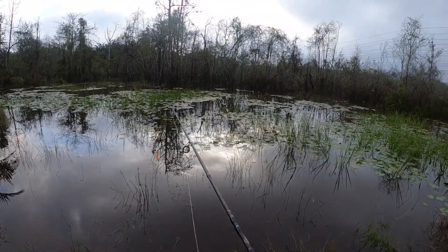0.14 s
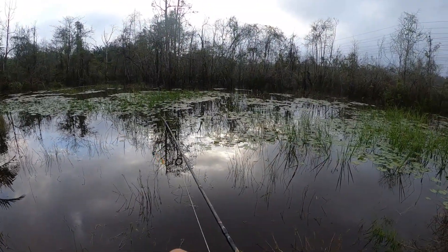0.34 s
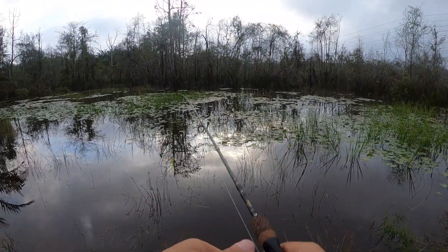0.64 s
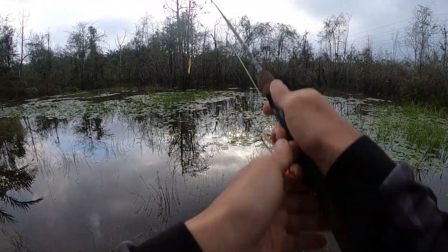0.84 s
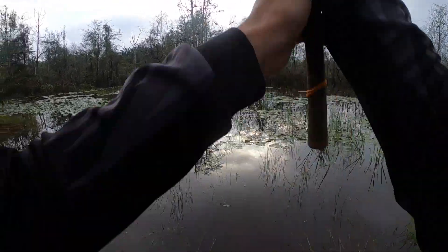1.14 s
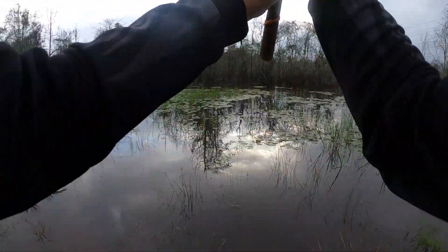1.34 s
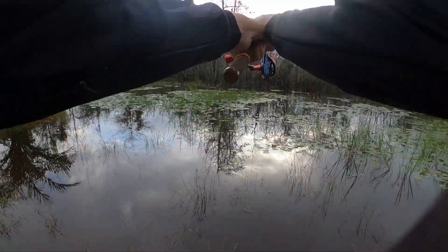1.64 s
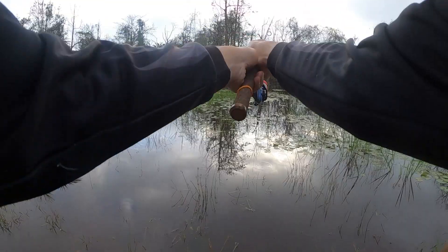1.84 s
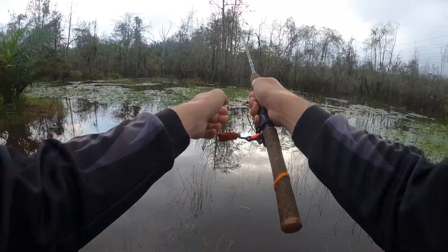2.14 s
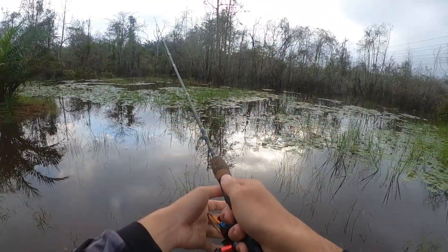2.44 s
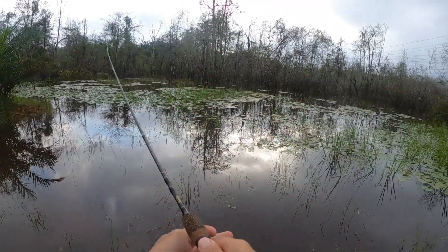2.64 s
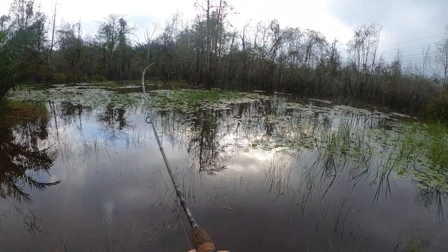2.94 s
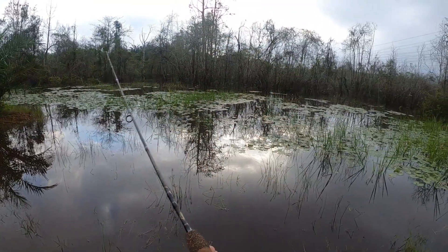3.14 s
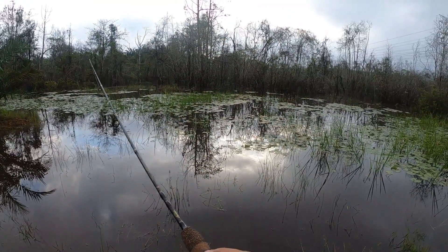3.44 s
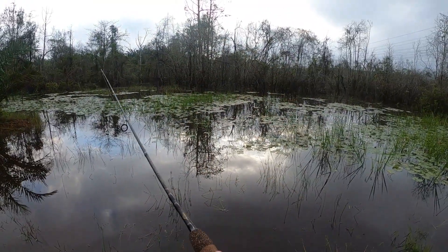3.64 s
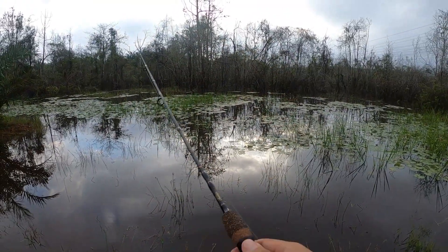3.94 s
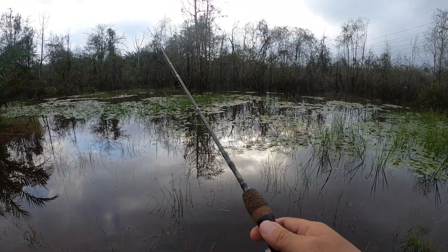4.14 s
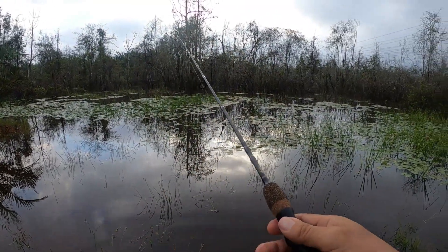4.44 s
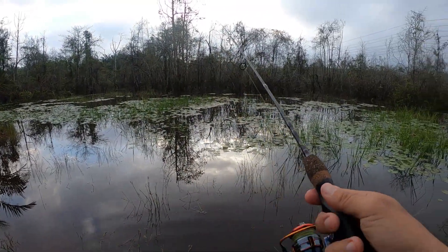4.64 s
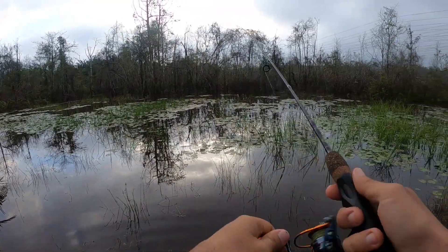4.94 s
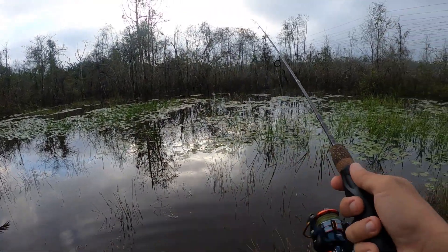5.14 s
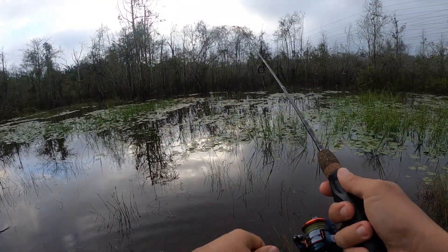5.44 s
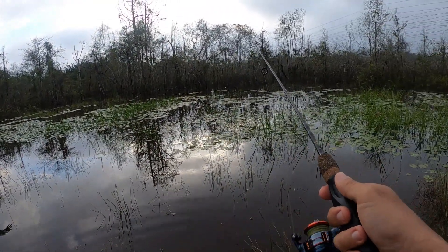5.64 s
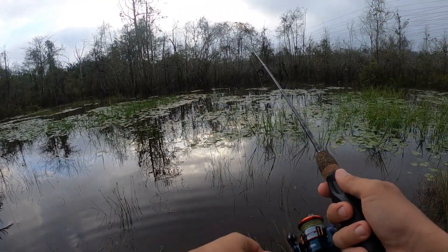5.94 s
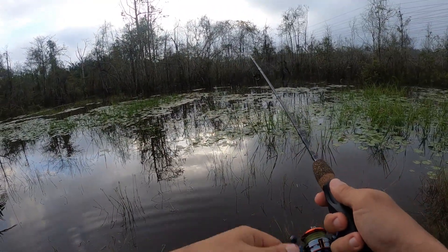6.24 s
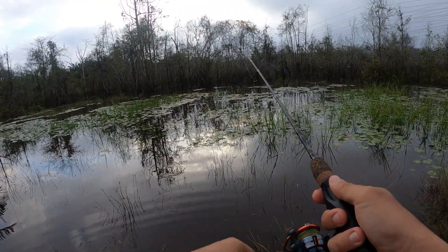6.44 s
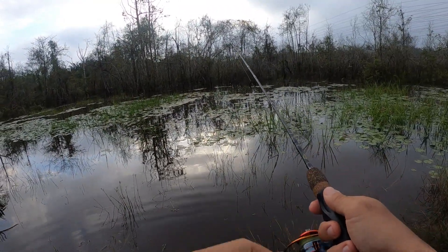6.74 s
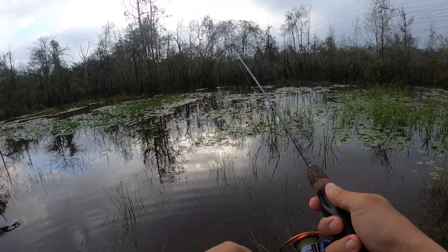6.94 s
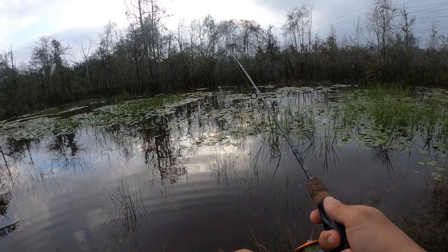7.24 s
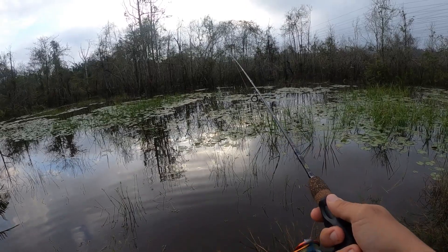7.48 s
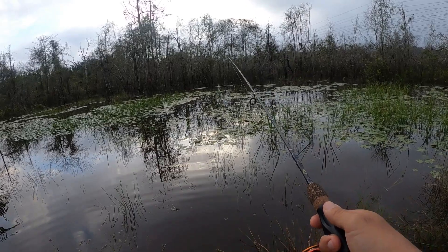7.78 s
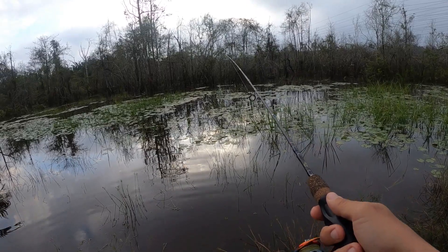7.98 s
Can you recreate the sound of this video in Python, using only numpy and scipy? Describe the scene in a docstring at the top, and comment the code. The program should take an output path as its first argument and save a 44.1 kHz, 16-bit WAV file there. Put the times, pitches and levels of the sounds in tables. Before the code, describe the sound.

Outdoors at a still swamp, a bird sings a quick wavering whistled phrase while another repeats a high falling chip. Cloth rubs, then a rod whips the air with a short swish and metallic reel rattle, followed by thin line hiss. A small plop lands, then sparse reel ticks and a sharp click. Low far calls and a returning song follow, over even hiss, shrill insects and soft rumble. The microphone is worn by the angler, handling close, birds echoing.

```python
"""Casting a line in a swamp

Songbirds sing in the trees: wavering sine whistles that slide in pitch, with echoes off water and trunks. One
bird repeats a high falling chip, others slur, and a lower call carries from far off. An angler casts: coloured
noise makes rod swish, line hiss and a splash; fading noise bursts make ticks, and short rings make knocks and
plops. Pulsing high tones make shrill insects; a faint low hum and moving air lie under an even hiss."""
import sys
import numpy as np
from scipy import signal
from scipy.fft import rfft, irfft
from scipy.io import wavfile
from scipy.ndimage import map_coordinates

SR = 44100
rng = np.random.default_rng(int(sys.argv[2]) if len(sys.argv) > 2 else 0)


def to_wav(s):
    """Save 16-bit WAV."""
    ch = np.atleast_2d(s).T  # columns
    pcm = np.round(np.clip(ch, -1, 1) * 32767)  # PCM
    wavfile.write(sys.argv[1], SR, pcm.astype(np.int16))


N = 357651  # length of the scene in samples

# Levels in the tables are starting points: most functions add an overall trim in dB.
# A "colour" is the shape of a noise over pitch; only its relative levels matter.

# The lead bird's song, note by note: [start_s into the song, length_s, start_hz, middle_hz, end_hz,
# level_db, warble_depth_hz, swell_over_note_db, repeat_delay_s, repeat_change_db]
SONG_NOTES = [(0.0, 0.125, 2950, 3094, 3200, -39, 16, 9, 0.0111, -0.5),
              (0.112, 0.16, 3110, 3104, 3020, -37, 114, 3, 0, -0.5),
              (0.271, 0.12, 2910, 3470, 3570, -31, -3, 5, -0.006, 0),
              (0.521, 0.13, 2760, 2610, 2677, -41.5, -11, -12.5, 0, 6),
              (0.781, 0.11, 4100, 3000, 2446, -35, -2, -7, -.015, -1.5),
              (0.99, 0.086, 4560, 4075, 3910, -34.5, 3, -10, -0.019, 2),
              (1.074, 0.071, 4100, 4760, 5420, -31, 296, 8, -.01, -2),
              (1.305, .11, 4600, 4400, 3900, -32.5, -6, 9, .004, 1),
              (1.406, 0.14, 3660, 3545, 3245, -28, 17, 1, -0.011, -7),
              (1.777, 0.064, 2570, 2626, 2330, -34.5, -16, 1, 0, 0),
              (1.826, 0.08, 2295, 1706, 1580, -45, -2, -17, 0, 0)]
# The two times it sings the song: [start_s, level_change_db, warble_rate_hz for a 3100 Hz note]
SONG_TIMES = [(.1, 1.5, 32.9), (6.636, 0.5, 36)]
# Other birds' slurs, which slide quickly and then more slowly: [start_s, length_s, start_hz, end_hz, level_db]
SLURS = [(0.045, 0.033, 4580, 3980, -31.5), (0.079, 0.059, 3940, 3970, -41),
         (0.272, 0.057, 2510, 2050, -50), (0.385, 0.1, 2350, 2090, -51.5), (0.535, 0.14, 2160, 2003, -43.5),
         (0.721, 0.077, 3510, 2620, -33.5), (0.799, 0.0293, 3060, 2820, -36.5),
         (4.176, 0.018, 3360, 3100, -55), (4.677, 0.29, 3220, 3104, -41.5),
         (4.808, 0.086, 1730, 1824, -39.5), (5.055, 0.038, 2010, 2140, -38.5),
         (5.094, 0.075, 2220, 2900, -42), (5.115, 0.072, 1705, 1674, -47.5), (5.153, .14, 2897, 2944, -42),
         (5.425, 0.0091, 4400, 5300, -36), (5.426, 0.032, 5250, 3370, -33), (5.461, 0.037, 3230, 3000, -38),
         (5.486, 0.178, 3850, 3740, -47), (5.792, 0.062, 4170, 3860, -48), (5.88, 0.07, 3470, 2750, -41),
         (5.978, 0.076, 2570, 2120, -44), (6.155, 0.061, 2080, 1950, -38.5),
         (6.312, 0.042, 3105, 2870, -42), (6.394, 0.021, 3100, 2930, -39)]
SLUR_BEND = .72  # share of the slide done by half time
SLUR_WARBLE_HZ, SLUR_WARBLE_OVER_S = 75.6, .2  # warble depth, only for slurs longer than this
# Tiny sharp chips of a small bird: [start_s, level_db]
TINY_CHIPS = [(0.39, -30), (0.482, -36), (0.813, -29), (1.123, -34.5), (1.323, -38)]
# A quick trill of falling notes: each is louder than the last until the top level
TRILL_S, TRILL_GAP_S = 3.869, .0372
TRILL_FIRST_DB, TRILL_GROWTH_DB, TRILL_TOP_DB = -48, 3, -37.5
# Notes around 2100 to 2750 Hz ring on longest among the trees
LONG_ECHO_FROM_HZ, LONG_ECHO_TO_HZ, LONG_ECHO_DB, LONG_ECHO_T60_S = 2110, 2750, -9, 1.4
# Songs and chips also arrive off the water and off the nearest trunks: [delay_ms, level_db]
BOUNCES = [(1.3, -8), (3.1, -12), (31, -15)]
# A warbling note is louder in its dips than on its crests, and its beat wanders by so many radians
WARBLE_DB_PER_HZ, WARBLE_WANDER_RAD = .019, .45

# The repeated falling chip: [start_s, length_s, end_hz, level_db]
CHIPS = [(0.695, 0.071, 3200, -40), (1.338, 0.087, 3950, -45), (1.997, 0.088, 3370, -45.5),
         (2.659, 0.1, 3400, -42.5), (3.313, 0.082, 3020, -38), (3.998, 0.096, 3130, -39),
         (4.69, .095, 3390, -37), (6.086, 0.078, 3140, -36), (6.865, 0.087, 3170, -36.5),
         (7.692, 0.083, 3450, -36)]
# Loudness along the fall, strongest at the top with bumps further down: [pitch_hz, level_change_db]
CHIP_LOUDNESS = [(3100, 0.5), (3750, -4.5), (4200, 9.5), (4550, 2), (5200, 10.5), (5500, 1), (5800, 16)]
CHIP_TOP_HZ = 5743
# The opening flick, set against the chip's table level: faint in the early chips, stronger later
UPSTROKE_FROM_S, UPSTROKE_DB, EARLY_UPSTROKE_DB = 3.7, 1.5, -21

# Far, low calls: [start_s, length_s, start_hz, middle_hz, end_hz, level_db,
# octave_db relative to the call, throb_depth 0-1]
FAR_CALLS = [(3.697, 0.1, 880, 923, 873, -44.5, 0.5, 0.3), (3.934, 0.034, 1060, 1030, 990, -39, -14, 0.1),
             (3.965, 0.0294, 977, 1010, 1080, -25, -31, 0), (3.995, 0.021, 1095, 1140, 1150, -34, -21, 0.1),
             (4.017, 0.056, 1136, 1178, 1160, -28.5, -18, .1), (4.165, 0.048, 985, 978, 970, -32.5, -18, 0),
             (4.197, 0.021, 1053, 1005, 1070, -23.5, -17, 0),
             (4.214, 0.14, 1057, 1153, 1080, -34, -19, 0.8), (4.356, 0.028, 1040, 998, 980, -31, -18, 0),
             (4.39, 0.022, 1028, 995, 1000, -29.5, -18, 0), (4.425, 0.023, 1000, 986, 980, -38, -16, 0),
             (4.458, 0.038, 1008, 981, 975, -33.5, -6, 0), (4.863, 0.13, 957, 1065, 1070, -47, -6, 0.64)]

SWELL_DB = 29  # every attack and release of a swell is the time taken to rise or fall by this much

# The rod cuts the air, swung back and then whipped forward in two gusts:
# [start_s, level_db, attack_s, hold_s, release_s]
SWISHES = [(1.66, -37, 0.2, 0.2, 0.15), (1.752, -21, 0.051, 0.007, 0.088),
           (1.784, -25, 0.05, 0.0068, 0.076)]
# Colour of the swish: [pitch_hz, level_db per Hz]
SWISH_COLOUR = [(120, -51), (200, -2), (430, -14), (554, -5), (798, -11), (1050, -0.5), (1190, -8.5),
                (1450, -5), (1710, -11), (2020, -5.5), (2560, 0.5), (3360, -13), (6350, -15.5),
                (12700, -44), (15500, -54)]
# Air pushed at the microphone by the forward stroke
PUFF_S, PUFF_DB, PUFF_ATTACK_S, PUFF_RELEASE_S = 1.768, -25, 0.065, 0.16
# Line whips through the guides as it is let go
RELEASE_S, RELEASE_DB, RELEASE_HOLD_S, RELEASE_EDGE_S = 1.85, -24, 0.0069, 0.034
# Colour of the line being let go: [pitch_hz, level_db per Hz]
RELEASE_COLOUR = [(470, -48), (800, -11.5), (1280, -22), (1640, -8.5), (2980, -5.5), (3170, -14.5),
                  (10300, -24.5), (15500, -61)]
# Line hisses off the spool, growing for about a second
SPOOL_HOLD_S, SPOOL_DB, SPOOL_RISE_DB_PER_S, SPOOL_STOP_S = 0.94, -51.5, 3.5, 0.43
# Colour of line hissing off the spool: [pitch_hz, level_db per Hz]
SPOOL_COLOUR = [(3000, -5.5), (6000, -5), (9000, 0), (12000, -0.5), (14000, -7), (16000, -14)]
# Thin hisses of line in the guides, and the lure's splash spray at 3.39 s:
# [start_s, level_db, attack_s, release_s]
THIN_HISSES = [(1.13, -51, 0.25, 0.34), (1.27, -43, 0.033, 0.073), (1.639, -47, 0.72, 0.25),
               (1.74, -33.5, 0.086, 0.34), (3.39, -45, 0.064, 0.075), (3.64, -51, 0.13, 0.33),
               (7.53, -57, 0.089, 0.25)]
# Colour of these thin hisses: [pitch_hz, level_db per Hz]
THIN_HISS_COLOUR = [(3000, 2.5), (6000, -1), (9000, 0), (11500, -6.5), (13500, -11), (16000, -33)]
# The arms lift, follow through and come down, and the sleeves rub:
# [start_s, level_db, attack_s, hold_s, release_s]
SLEEVES = [(1.1, -49, 1, 0.039, 1.7), (2.15, -50.5, 0.26, 0.04, 0.58), (2.62, -41, 0.39, 0.12, 0.52)]
# Colour of the rubbing cloth: [pitch_hz, level_db per Hz]
SLEEVE_COLOUR = [(100, 12), (300, 2.5), (600, 2), (2000, 2.5), (5000, -5.5), (10000, -27.5)]

# The reel rattles as the rod whips forward, then clacks twice as the line goes: [start_s, level_db]
RATTLES = [(1.739, -19), (1.750, -14), (1.7555, -16), (1.766, -22), (1.776, -14), (1.782, -17),
           (1.790, -16), (1.807, -21), (1.814, -16), (1.847, -19.5), (1.861, -27)]
# What the rattling reel rings with: [pitch_hz, level_db, t60_s]
REEL_MODES = [(650, -13, 0.011), (1060, -12.5, 0.043), (1450, -25, 0.021), (2100, -3.5, 0.055),
              (2420, -3.5, 0.045), (2616, -5, 0.069), (2900, -4, 0.035), (5300, -8, 0.0074),
              (7600, -29, .15)]
# Reel and line ticks: [start_s, treble_db, body_db, left_right_db]
TICKS = [(1.2683, -34.5, -49, -6), (2.17, -29.5, -33.5, -6), (3.8492, -30, -37, -2), (5.029, -33, -34, -2),
         (5.2829, -25, -32, 3), (5.469, -11.5, -32.5, -2), (5.757, -30, -40, 6), (5.9793, -32, -36.5, -4),
         (6.2707, -29, -43, 1), (6.364, -54, -38, -2), (6.787, -19, -33.5, 2), (7.785, -22.5, -34.5, -6)]
# A tick is a very short snap with a slightly longer body (times to fall by 60 dB)
SNAP_T60_S, TICK_BODY_T60_S = .004, .035
# Knocks of hands and tackle, and plops in the water: [start_s, level_db, pitch_hz, t60_s]
KNOCKS = [(0.077, -21, 3040, 0.0088), (0.079, -34.5, 1347, 0.039), (0.082, -28.5, 413, 0.027),
          (.083, -41, 905, 0.068), (0.693, -25, 202, 0.025), (.699, -26, 185, 0.082),
          (0.701, -37, 340, 0.068), (2.179, -27.5, 3420, 0.0073), (3.001, -32, 2460, 0.0091),
          (3.388, -36.5, 1490, 0.023), (3.394, -31.5, 1110, 0.04), (3.406, -33, 1010, 0.024),
          (3.411, -40, 1940, 0.07), (3.42, -27.5, 660, 0.035), (4.349, -34, 2920, 0.028),
          (5.284, -43, 760, 0.018), (5.2908, -26.5, 1440, 0.02), (5.344, -31, 1260, 0.015),
          (5.3443, -24.5, 770, 0.015), (5.397, -30.5, 1220, 0.058), (7.55, -32, 193.5, 0.15)]

# Two steady bands of far frogs and insects: [pitch_hz, width_hz, level_db]
CHORUS = [(1335, 244, -56), (4900, 1100, -91)]
# The insects and chorus sink around the cast
LULL_S, LULL_DB, LULL_FADE_S, LULL_HOLD_S, LULL_RECOVER_S = 1.68, -8.5, 0.85, 0.38, 2.9

# Bouts of chatter from birds deep in the trees: [start_s, level_db, attack_s, hold_s, release_s]
CHATTER = [(0, -50.5, .1, 1.96, 1.7), (5.2, -47.5, 5.5, 2.9, 1.1)]
# Bouts of a thin, far twitter: [start_s, level_db, attack_s, hold_s, release_s]
TWITTER = [(2.95, -59, 0.44, 0.19, .2), (3.78, -61.5, 0.94, 0.13, .15), (4.12, -55, .2, 0.035, .15),
           (4.39, -56, .1, 0.031, 0.081)]
# Colour of the merged echoes of far birdsong: [pitch_hz, level_db per Hz]
ECHO_COLOUR = [(500, -33), (900, -8), (1700, -8), (2200, -9.5), (2800, 1.5), (3600, -9), (4300, -9.5),
               (5300, -11), (6300, -62), (9500, -17), (12000, -51)]
# Blurred calls from deep in the woods: [start_s, level_db, attack_s, hold_s, release_s]
WOODS = [(3.8, -45, 0.57, 0, 0.89), (4.45, -41, 1.4, 0, 1.7), (5.6, -53.5, 3, 0.69, 0.76)]
# Colour of those calls: [pitch_hz, level_db per Hz]
WOODS_COLOUR = [(500, 3.5), (750, -5.5), (1000, 13), (1400, 7), (1700, 13.5), (1980, 13), (2200, 2.5),
                (3500, -27), (5000, -61)]

# Colour of the outdoor hiss: [pitch_hz, level_db per Hz]
HISS_COLOUR = [(180, -18), (300, 4.5), (453, -14.5), (744, -11), (808, -23.5), (1330, -6), (2320, -26),
               (2880, -18.5), (4000, -15.5), (4720, -6), (5660, -12.5), (7020, -10.5), (13800, -43.5),
               (15500, -76)]
HISS_DB = -46.5
# How alike the hiss is in both ears: [pitch_hz, likeness, where below 0 counts as 0]
HISS_LIKENESS = [(60, 0.92), (150, 0.065), (380, -0.77), (950, 0.67), (2380, 0.39), (5980, 1),
                 (15000, -0.83)]
# Steady air on the microphone: [time_s, level_db]
BREEZE = [(0, -42.5), (.9, -44.5), (1.9, -41), (3.8, -45.5), (5.5, -47.5), (7.001, -41.5), (8.11, -45)]
# Handling buffets the microphone: [start_s, level_db, attack_s, hold_s, release_s]
BUFFETS = [(1.15, -31.5, 0.46, 0.18, 0.34), (1.75, -36, 1, 0.21, 0.35), (2.7, -33.5, 0.66, 0.0085, 0.13),
           (3.4, -41.5, 0.25, 0.26, .2), (3.88, -42, 0.25, 0, .15), (4.11, -35.5, 0.79, 0.038, 0.13),
           (4.67, -39, 0.097, 0.024, 0.14), (6.28, -38, 0.16, 0.16, .4), (7.68, -34.5, 0.6, 0, 0.43)]
# Colour of the moving air: [pitch_hz, level_db per Hz]
RUMBLE_COLOUR = [(12, -55), (20, -4.5), (59, 4.5), (97, 1.5), (128, -1.5), (161, -0.5), (238, -8),
                 (325, -15), (362, -17), (500, -20.5), (650, -24.5), (1100, -120)]
GUST_DB = 2.4  # spread of the moving air's level
# A distant motor swells on its low note: [start_s, level_db, attack_s, hold_s, release_s]
LOW_HUM = [(7.05, -38.5, 1.47, 0.35, 1.63)]
# And on its upper note: [start_s, level_db, attack_s, hold_s, release_s]
UPPER_HUM = [(.65, -47.5, 4.4, 0.5, 0.67), (1.5, -56.5, 0.97, 10.5, 2.6), (7.6, -44, 0.52, -0.5, 0.97)]
CUTOFF_HZ = 15600


def songbirds(db=-1, wet_db=-5.0, flutter_db=1.0):
    """Sliding whistles make a repeated song, stray slurs, a trill and tiny chips, with echo from the trees."""
    out = np.zeros(N)
    for repeat, (begin, song_db, rate_hz) in enumerate(SONG_TIMES):
        for s, length, start, middle, end, note_db, warble, rise_db, delay_s, change_db in SONG_NOTES:
            # higher notes warble faster
            warble_hz = rate_hz * (middle / 3100) ** 1.3
            note = whistle(length, [start, middle, end], song_db + note_db + repeat * change_db, warble,
                           edge=0.41, warble_hz=warble_hz, waver=0.0067, rise_db=rise_db)
            add(out, begin + s + repeat * delay_s, note)
    for s, length, start, end, note_db in SLURS:
        warble = SLUR_WARBLE_HZ * (length > SLUR_WARBLE_OVER_S)
        middle = start + SLUR_BEND * (end - start)
        add(out, s, whistle(length, [start, middle, end], note_db, warble, edge=0.22, waver=0.0123))
    for s, note_db in trill():
        add(out, s, whistle(0.0205, [3600, 3400, 3130], note_db, edge=0.74))
    for s, note_db in TINY_CHIPS:
        add(out, s, tiny_chip(note_db))
    out = bounced(out) * from_db(db + flutter_db * drift(90))
    ringing_notes = band(out, LONG_ECHO_FROM_HZ, LONG_ECHO_TO_HZ, order=4)
    long_echo = from_db(LONG_ECHO_DB) * trees(ringing_notes, t60=LONG_ECHO_T60_S, onset_s=0.056, alike=0.44)
    echo = from_db(wet_db) * trees(out, t60=1.18, onset_s=0.0036, alike=0.24)
    return place(out, pan_db=1.5, lag_ms=-0.047) + echo + long_echo


def trill(count=8):
    """Evenly spaced notes that grow louder up to a top level: rows of (start_s, level_db)."""
    return [(TRILL_S + k * TRILL_GAP_S, min(TRILL_FIRST_DB + k * TRILL_GROWTH_DB, TRILL_TOP_DB))
            for k in range(count)]


def tiny_chip(db, length=.02, overtone_db=-27):
    """A tiny sharp chip: a flick up to a high peak, then a drop."""
    peak = whistle(0.42 * length, [5200, 6150, 5200], db - 0.5, octave_db=overtone_db, edge=0.051, waver=0.04)
    drop = whistle(0.49 * length, [4700, 4200, 3750], db, octave_db=overtone_db, edge=0.13, waver=0.043)
    return np.concatenate([peak, drop])


def chipper(db=0, wet_db=-6, flutter_db=2, upstroke_s=0.0144, bend=0.46):
    """Each chip flicks up to its top pitch and then sweeps down, its loudness following its pitch."""
    out = np.zeros(N)
    for s, length, end, note_db in CHIPS:
        middle = CHIP_TOP_HZ + bend * (end - CHIP_TOP_HZ)
        fall = whistle(length, [CHIP_TOP_HZ, middle, end], note_db, edge=0.12, waver=0.011)
        falling_hz = np.linspace(CHIP_TOP_HZ, end, len(fall))  # a straight line is near enough for loudness
        add(out, s, fall * from_db(np.interp(falling_hz, *np.transpose(CHIP_LOUDNESS))))
        upstroke_db = UPSTROKE_DB if s > UPSTROKE_FROM_S else EARLY_UPSTROKE_DB
        rising_hz = CHIP_TOP_HZ * np.array([.8, .98, 1.01])
        add(out, s - .009, whistle(upstroke_s, rising_hz, note_db + upstroke_db, edge=0.47))
    out = bounced(out) * from_db(db + flutter_db * drift(150))
    echo = from_db(wet_db) * trees(out, t60=0.7, onset_s=0.0015, alike=0.31)
    return place(out, pan_db=-0.5, lag_ms=0.023) + echo


def far_bird(db=-2, wet_db=-4, rough_db=1.5, rasp=0.14, rasp_hz=170, throb_hz=52):
    """Low, hoarse calls that slide, throb and break into pulses, with much echo."""
    out = np.zeros(N)
    for s, length, start, middle, end, note_db, octave_db, throb in FAR_CALLS:
        call = whistle(length, [start, middle, end], note_db, octave_db=octave_db, edge=0.65, waver=0.011)
        t = np.arange(len(call)) / SR
        add(out, s, call * (1 + throb * np.sin(2 * np.pi * throb_hz * t)))
    # an unsteady throat spreads each line into a narrow band
    out *= from_db(db + rough_db * drift(70)) * (1 + rasp * drift(rasp_hz))
    echo = from_db(wet_db) * trees(out, t60=0.6, onset_s=0.013, alike=1.0)
    return place(out + echo, pan_db=-1.5, lag_ms=-0.1)


def cast(swish_grain_db=0.0, hiss_grain_db=2, hiss_db=1):
    """Sleeves rub, the rod whips the air, line hisses and the lure's splash sprays: all swelling noise."""
    swish = level(SWISHES) * noise(SWISH_COLOUR, 0.7) * from_db(swish_grain_db * drift(400))
    push = swell(PUFF_S, PUFF_DB, PUFF_ATTACK_S, 0, PUFF_RELEASE_S)
    puff = push * noise([(12, -26), (32, 9), (60, -29), (150, -55), (400, -77)], 0.59)
    let_go = swell(RELEASE_S, RELEASE_DB, RELEASE_EDGE_S, RELEASE_HOLD_S, RELEASE_EDGE_S)
    release = let_go * noise(RELEASE_COLOUR, 0.48) * from_db(swish_grain_db * drift(550))
    since_release_s = np.clip(np.arange(N) / SR - RELEASE_S, 0, SPOOL_HOLD_S)
    spool_level_db = SPOOL_DB + SPOOL_RISE_DB_PER_S * since_release_s
    spool = swell(RELEASE_S, spool_level_db, RELEASE_EDGE_S, SPOOL_HOLD_S, SPOOL_STOP_S)
    thin = level([(s, db, attack, 0, fade) for s, db, attack, fade in THIN_HISSES])
    hisses = spool * noise(SPOOL_COLOUR, 0.072) + thin * noise(THIN_HISS_COLOUR, 0.14)
    hisses = hisses * from_db(hiss_db + hiss_grain_db * drift(210))
    sleeves = level(SLEEVES) * noise(SLEEVE_COLOUR, 0.64) * from_db(1.16 * drift(60))
    body = place(swish + puff + sleeves, pan_db=-2.0, lag_ms=-0.024)
    return body + release + place(hisses, pan_db=0.0, lag_ms=0)


def reel(db=-1, uneven_db=1.0, crack_db=-9, crack_t60=0.0037):
    """Each rattle is a short crack that sets the reel's modes ringing, a little differently every time."""
    t, out = np.arange(SR // 5) / SR, np.zeros(N)
    hz, mode_db, t60 = np.transpose(REEL_MODES)[:, :, None]
    for s, hit_db in RATTLES:
        strength = from_db(mode_db + uneven_db * rng.standard_normal(hz.shape))
        strength = strength * rng.choice([-1, 1], hz.shape)
        ring = np.sum(strength * np.sin(2 * np.pi * hz * t) * from_db(-60 * t / t60), axis=0)
        crack = rms_one(band(rng.standard_normal(len(t)), 900, 8000)) * from_db(crack_db - 60 * t / crack_t60)
        add(out, s, from_db(db + hit_db) * (ring + crack))
    return place(out, pan_db=-1.5, lag_ms=-0.049)


def tackle(snap_db=-2.5, body_db=0.0, scuff=0.42, scuff_t60=0.048):
    """Dry ticks are fading noise bursts; knocks and plops are short rings with a scuff of noise."""
    t = np.arange(SR // 10) / SR
    ticks, knocks = np.zeros((2, N)), np.zeros(N)
    for s, treble_db, low_db, pan_db in TICKS:
        snap = rms_one(band(rng.standard_normal((2, len(t))), 5800, 10700, order=3))
        snap = snap * from_db(treble_db + snap_db - 60 * t / SNAP_T60_S)
        body = rms_one(band(rng.standard_normal(len(t)), 600, 4800))
        body = body * from_db(low_db + body_db - 60 * t / TICK_BODY_T60_S)
        add(ticks, s, (snap + body) * from_db(pan_db / 2 * np.array([[1], [-1]])))
    for s, db, hz, t60 in KNOCKS:
        contact = rms_one(band(rng.standard_normal(len(t)), hz / 2, hz * 2, order=3))
        contact = scuff * contact * from_db(-60 * t / scuff_t60)
        ring = np.sin(2 * np.pi * hz * t) * from_db(-60 * t / t60)
        add(knocks, s, from_db(db) * (ring + contact))
    return ticks + place(knocks, pan_db=-5.0, lag_ms=-0.02)


def insects(db=-48, top_hz=7380, bottom_hz=6720, pulse_hz=15.0, width_hz=130, depth=0.019):
    """Shrill insects whose wing strokes each slide down in pitch, over steady bands of far chorus."""
    t, out = np.arange(N) / SR, 0
    for lead in np.arange(2) / 2:  # two voices, about half a stroke apart
        stroke = (pulse_hz * t + lead + 0.0418 * drift(3)) % 1
        phase = 2 * np.pi * np.cumsum(top_hz + (bottom_hz - top_hz) * stroke) / SR
        # uneven teeth on the wing spread the tone into a narrow band
        teeth = noise([(1, 0), (width_hz, 0), (3 * width_hz, -30), (2000, -90)], 0.023)
        out = out + from_db(db) * teeth * np.sin(phase) * (1 + depth * np.cos(4 * np.pi * stroke))
    for hz, width, band_db in CHORUS:
        flat = noise([(1, 0), (SR, 0)], 0.52)
        out = out + from_db(band_db) * rms_one(band(flat, hz - width / 2, hz + width / 2))
    return out


def deep_birds(low_hz=2650, high_hz=3750, direct_db=-11, twitter_hz=4950, twitter_s=0.035,
               twitter_wet_db=-3, count=170):
    """Random slurs from deep in the trees, mostly heard as echo, and a quick twitter of falling notes."""
    slurs, twitter = np.zeros(N), np.zeros(N)
    for k, (when, pitch, length, slide) in enumerate(rng.random((count, 4))):
        hz = low_hz + pitch * (high_hz - low_hz)
        glide = 1 + (slide + .3) * np.array([.08, 0, -.05])
        add(slurs, (k + when) / count * N / SR, whistle(0.0254 + 0.039 * length, hz * glide, 0, edge=0.09))
    for s in np.arange(0, N / SR, twitter_s):
        late_s, note_db = rng.normal(0, [.004, 2.5])
        note = whistle(0.026, twitter_hz * np.array([1.1, 1, .92]), note_db, edge=0.95, waver=0.015)
        add(twitter, s + late_s, note)
    # the bouts fade these unbroken streams in and out
    slurs = slurs * level(CHATTER)
    twitter = twitter * level(TWITTER) * from_db(8.5 + 1.1 * drift(12))
    echo = trees(slurs + from_db(twitter_wet_db) * twitter, t60=0.26, onset_s=0.0076, alike=0.68)
    return place(from_db(direct_db) * slurs + twitter + echo, pan_db=-1, lag_ms=-.04)


def far_echo(db=-1):
    """Birdsong from all round the swamp, scattered into noise until no single note is left."""
    return place(from_db(db) * level(CHATTER) * noise(ECHO_COLOUR, 0.34), pan_db=-6.0, lag_ms=-0.085)


def outdoors(hiss_db=0.0, rumble_db=-2.5, breeze_db=4, hum_hz=101, upper_hz=168):
    """Even hiss, low buffeting air, a far motor's two wandering tones and the blur of calls in the woods."""
    t = np.arange(N) / SR
    hiss = from_db(HISS_DB + hiss_db + .5 * drift(3.41)) * noise(HISS_COLOUR, at_hz(HISS_LIKENESS))
    breeze = from_db(breeze_db + np.interp(t, *np.transpose(BREEZE)))
    air = np.hypot(breeze, level(BUFFETS))
    rumble = air * noise(RUMBLE_COLOUR, 0.89) * from_db(rumble_db + GUST_DB * drift(14))
    low = level(LOW_HUM) * np.sin(2 * np.pi * np.cumsum(hum_hz + 1.008 * drift(6.5)) / SR)
    upper = level(UPPER_HUM) * np.sin(2 * np.pi * np.cumsum(upper_hz + 8 * drift(6)) / SR)
    hum = np.sqrt(2) * (low + upper) * from_db(2 * drift(7.4))
    woods = level(WOODS) * noise(WOODS_COLOUR, 0.46)
    return place(hiss + rumble + hum + woods, pan_db=-0.46, lag_ms=-0.052)


def whistle(length, pitches, db, warble=0, octave_db=-99, edge=.4, warble_hz=29, waver=0.0072, rise_db=0):
    """A near sine that slides on a parabola through three pitches, wavering a little, with soft ends."""
    t = np.arange(max(int(length * SR), 2)) / SR
    unsteady = np.interp(t * 140, np.arange(64), rng.standard_normal(64))
    slide = np.polyfit([0, .5, 1], pitches, 2)
    hz = np.polyval(slide, t / length) * (1 + waver * unsteady)
    quaver = warble * np.sin(2 * np.pi * warble_hz * t + WARBLE_WANDER_RAD * unsteady)
    phase = 2 * np.pi * np.cumsum(hz + quaver) / SR
    loudness_db = rise_db * t / length - WARBLE_DB_PER_HZ * quaver
    envelope = signal.windows.tukey(len(t), edge) * from_db(loudness_db)
    return from_db(db) * rms_one(envelope) * (np.sin(phase) + from_db(octave_db) * np.sin(2 * phase))


def bounced(x):
    """A few reflections interfere with a sliding note, so it beads and doubles; the power stays the same."""
    out = x.copy()
    for delay_ms, db in BOUNCES:
        add(out, delay_ms / 1000, from_db(db) * x)
    return out * np.std(x) / np.std(out)


def trees(x, t60, onset_s, alike):
    """Trunks and foliage scatter a call into a dense tail that builds up and dies away."""
    t = np.arange(2 * SR) / SR
    mid, side = rng.standard_normal((2, len(t)))
    echoes = stereo(mid, side, alike) * from_db(-60 * t / t60) * (1 - np.exp(-t / onset_s))
    return signal.fftconvolve(x[None], echoes / np.sqrt(np.sum(echoes ** 2) / 2), axes=1)[:, :N]


def noise(colour, alike):
    """Coloured stereo noise of unit power with a given left-right likeness."""
    mid, side = rfft(rng.standard_normal((2, N)))
    return rms_one(irfft(stereo(mid, side, alike) * from_db(at_hz(colour)), N))


def stereo(mid, side, alike):
    """Left and right share the middle signal and differ by the side signal; likeness runs 0-1."""
    alike = np.clip(alike, 0, 1)
    return np.sqrt(1 + alike) * mid + np.sqrt(1 - alike) * side * [[1], [-1]]


def place(x, pan_db, lag_ms):
    """Direction: a left-over-right level difference and a delay of the left ear (negative is earlier)."""
    left, right = np.broadcast_to(x, (2, N))
    left = map_coordinates(left, [np.arange(N) - lag_ms * SR / 1000], order=3)
    return np.array([left * from_db(pan_db / 2), right * from_db(-pan_db / 2)])


def swell(s, db, attack_s, hold_s, release_s):
    """Gain over time: it rises to its level at s, holds, and dies away."""
    t = np.arange(N) / SR - s
    before = np.maximum(-t, 0) / max(attack_s, 1e-3)
    after = np.maximum(t - hold_s, 0) / max(release_s, 1e-3)
    return from_db(np.maximum(db - SWELL_DB * (before + after), -140))


def level(rows):
    """Gain over time of several swells, added in power."""
    return np.sqrt(sum(swell(*row) ** 2 for row in rows))


def drift(rate):
    """Slow chance with spread 1, moving to a new random value so many times a second."""
    knots = rng.standard_normal(int(N / SR * 1000))
    return rms_one(np.interp(np.arange(N) / SR * rate, np.arange(len(knots)), knots))


def at_hz(points):
    """A table over pitch read at every frequency bin."""
    hz, value = np.transpose(points)
    return np.interp(np.log(np.fft.rfftfreq(N, 1 / SR) + 1), np.log(hz), value)


def band(x, low_hz, high_hz, order=2):
    """Butterworth band-pass: keeps only the pitches between two limits."""
    edges = [low_hz, min(high_hz, SR / 2 - 1)]
    return signal.sosfilt(signal.butter(order, edges, "band", fs=SR, output="sos"), x + 1e-18)


def add(track, s, sound):
    """Mix a sound in at a time."""
    at = max(round(s * SR), 0)
    track[..., at:at + sound.shape[-1]] += sound[..., :max(N - at, 0)]


def rms_one(x):
    """Scale to unit power."""
    return x / np.sqrt(np.mean(x ** 2) + 1e-20)


def from_db(db):
    """Decibels to gain."""
    return 10 ** (np.asarray(db) / 20)


def scene():
    """The swamp and the angler together."""
    birds = songbirds() + chipper() + far_bird()
    angler = cast() + reel() + tackle()
    lull = from_db(LULL_DB * swell(LULL_S, 0, LULL_FADE_S, LULL_HOLD_S, LULL_RECOVER_S))
    background = lull * insects() + deep_birds() + far_echo() + outdoors()
    return birds + angler + background


def record(dry):
    """The top is cut steeply."""
    return signal.sosfilt(signal.ellip(10, .1, 90, CUTOFF_HZ, fs=SR, output="sos"), dry)


dry = scene()
out = record(dry)
to_wav(out)
```